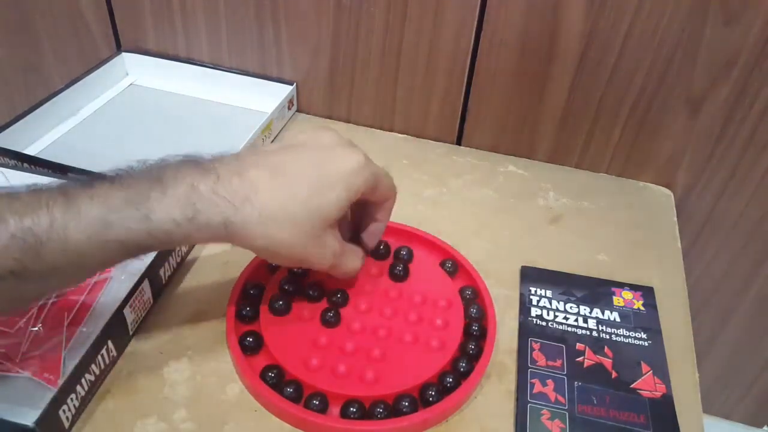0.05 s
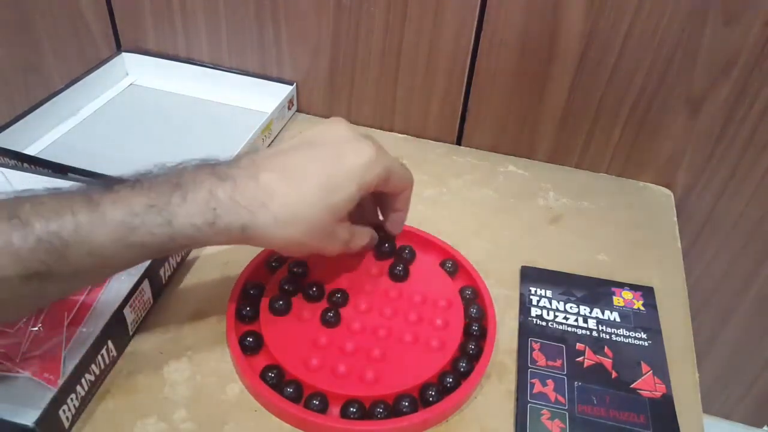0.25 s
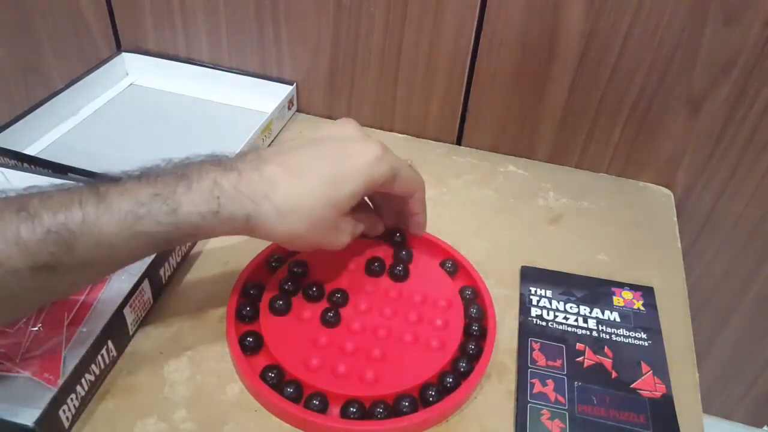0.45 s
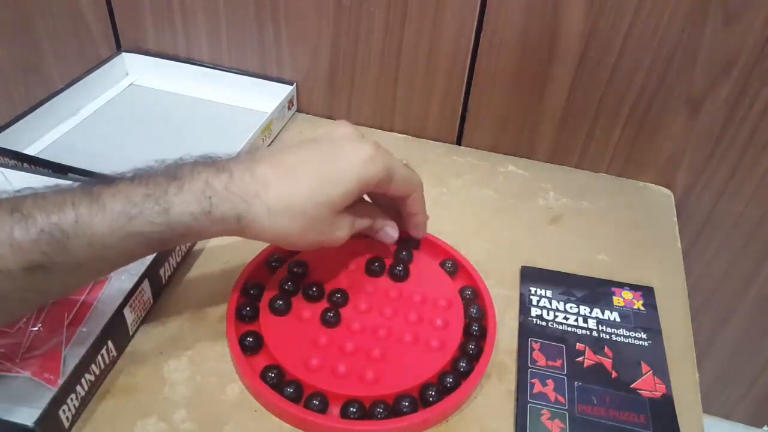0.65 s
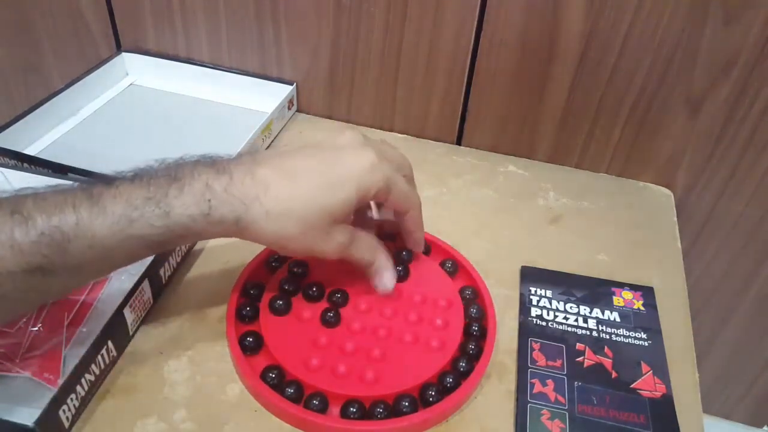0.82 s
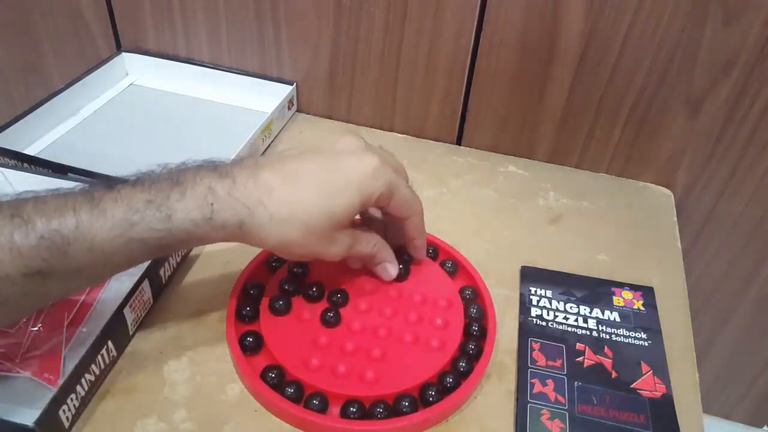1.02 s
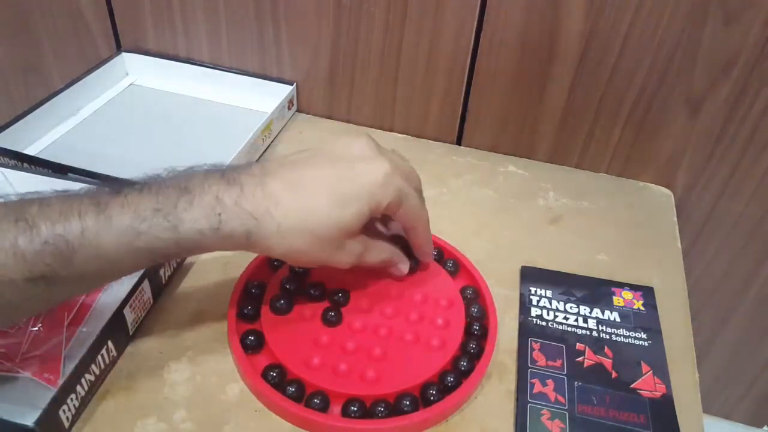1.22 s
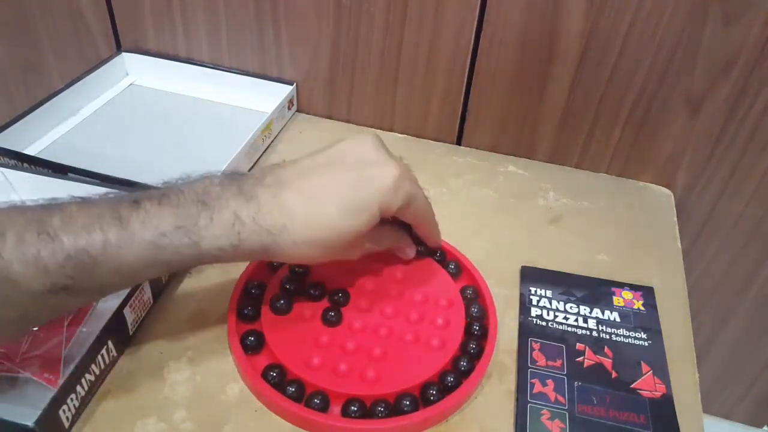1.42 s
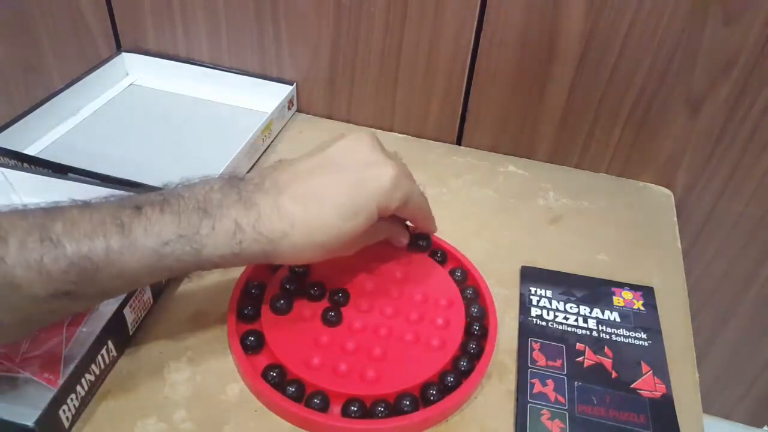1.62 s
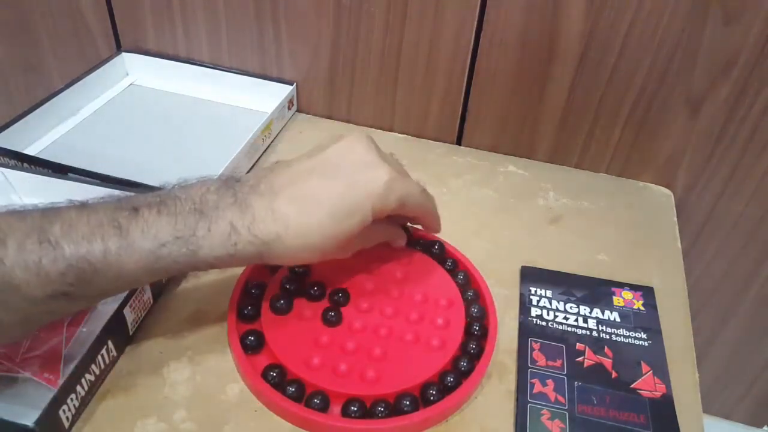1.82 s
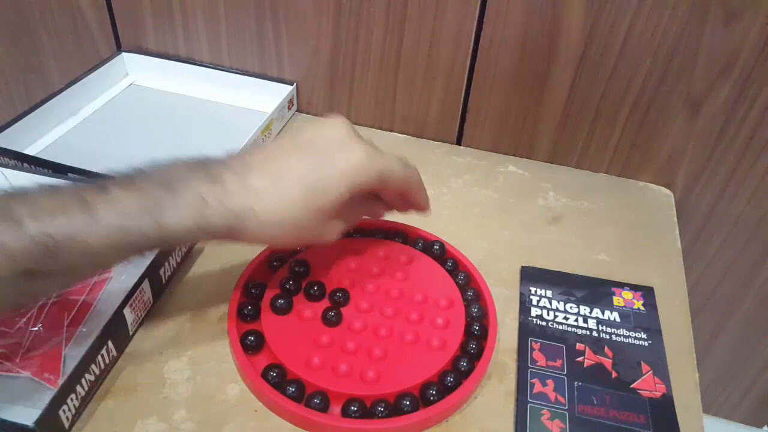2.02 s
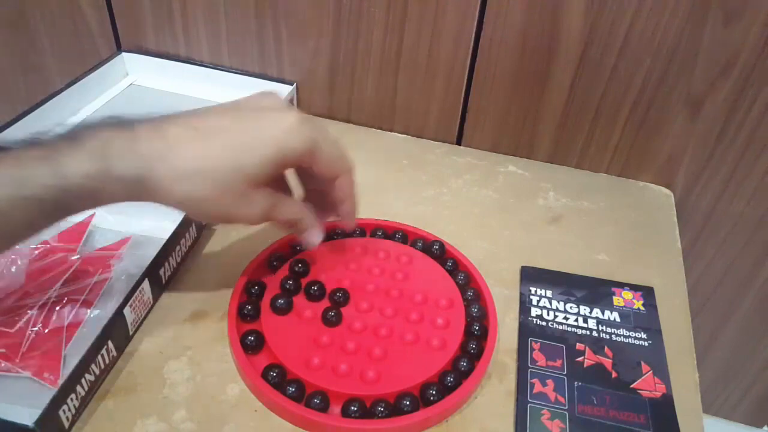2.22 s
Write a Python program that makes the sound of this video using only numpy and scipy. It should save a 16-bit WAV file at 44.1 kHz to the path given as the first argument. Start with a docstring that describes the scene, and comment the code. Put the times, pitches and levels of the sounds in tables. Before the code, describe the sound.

Marbles moved by hand clack unevenly onto a plastic board, with bright glassy ticks, tiny rolls and soft thumps from the table beneath. The sound is close, in a small room, and ends with only a faint hum and brief whine.

```python
"""Glass marbles, moved by hand, knock on a plastic solitaire board on a wooden table in a small room.
Each landing cracks at the contact, rings the board and its rim, and thumps the table.
The marbles also click against each other and roll a little, feeding tiny bumps into the board.
Under them are room air, a low hum and, at the end, a faint rising whine. Nearly mono."""
import sys
import numpy as np
from scipy import signal
from scipy.fft import rfft, irfft, next_fast_len
from scipy.io import wavfile
from scipy.ndimage import map_coordinates

SR = 44100
rng = np.random.default_rng(int(sys.argv[2]) if len(sys.argv) > 2 else 0)


def unload_wav(signal):
    """Save mono or channel-first audio to the path in sys.argv[1] as 16-bit WAV at rate SR, clipped to [-1, 1]."""
    wavfile.write(
        sys.argv[1],
        SR,
        np.round(np.clip(np.atleast_2d(signal).T, -1, 1) * 32767).astype(np.int16),
    )


N = 103635
HIT_N = SR // 2
T, HIT_T = np.arange(N) / SR, np.arange(HIT_N) / SR


def amp(db):
    """Decibels to gain."""
    return 10 ** (np.asarray(db) / 20)


def unit(x):
    """Scale to rms 1."""
    return x / np.sqrt(np.mean(x ** 2) + 1e-20)


def at_level(x, db, window_s=0.03):
    """Set the rms of a hit's opening window."""
    return amp(db) * x / np.sqrt(np.mean(x[:round(window_s * SR)] ** 2))


def along(points, hz):
    """Interpolate (f/Hz, value) points over log frequency."""
    f, values = np.transpose(points)
    return np.interp(np.log(hz + 1), np.log(f + 1), values)


def coloured(x, spectrum):
    """Filter by (f/Hz, level/dB) points."""
    m = next_fast_len(len(x) + 2048)
    gain = amp(along(spectrum, np.fft.rfftfreq(m, 1 / SR)))
    return irfft(rfft(x, m) * gain, m)[:len(x)]


def wobble(knots_per_s):
    """Smooth random curve."""
    return map_coordinates(rng.standard_normal(128), [T * knots_per_s], mode="mirror")


def add(track, start_s, sound):
    """Mix a sound into the track."""
    i = max(0, round(start_s * SR))
    track[i:i + len(sound)] += sound[:max(0, N - i)]


def burst(spectrum, t60_s):
    """Dense, heavily damped modes excited by a contact."""
    return unit(coloured(rng.standard_normal(HIT_N), spectrum) * amp(-60 * HIT_T / t60_s))


def ring(modes, scatter_db=5.5):
    """Modes that ring on; strength and sign vary from spot to spot."""
    out = np.zeros(HIT_N)
    for hz, db, t60_s in modes:
        sign = rng.choice([-1, 1])
        envelope = amp(db + scatter_db * rng.standard_normal() - 60 * HIT_T / t60_s)
        out += sign * envelope * np.sin(2 * np.pi * hz * HIT_T)
    return unit(out)


def swell(x, rise_s):
    """A body takes a moment to get moving."""
    return x * (1 - np.exp(-HIT_T / rise_s))


def tuned(spectrum, spot_hz, board_hz=800):
    """Slide the board's main resonance to that of one spot."""
    return np.array(spectrum) * [spot_hz / board_hz, 1]


# Room decay: f/Hz, t60/s
ROOM_DECAY = [(150, 0.23), (1000, 0.36), (3000, 0.27), (7000, 0.24), (15000, 0.21)]
# Wall echoes: t/s, level/dB
WALL_ECHOES = [(.0031, -6.5), (.0105, -8.5), (.0135, -12.5), (.019, -15.5)]


def in_room(x, tail_db, onset_s=0.0093, path_spread=0.06, echo_cutoff_hz=3020):
    """Direct sound, dull echoes off the near walls and the small room's tail."""
    hz, t, noise = signal.stft(rng.standard_normal(HIT_N), SR, nperseg=256)
    decay = amp(-60 * t / along(ROOM_DECAY, hz)[:, None])
    tail = signal.istft(noise * decay, SR, nperseg=256)[1]
    tail *= 1 - np.exp(-(np.arange(len(tail)) / SR / onset_s) ** 2)
    echoes = np.zeros(len(tail))
    for mean_s, db in WALL_ECHOES:
        delay_s = abs(mean_s * (1 + path_spread * rng.standard_normal()))
        echoes[round(delay_s * SR)] += amp(db)
    echoes = signal.lfilter(*signal.butter(2, echo_cutoff_hz, fs=SR), echoes)
    response = amp(tail_db) * tail / np.linalg.norm(tail) + echoes
    return x + signal.fftconvolve(x, response)[:len(x)]


# Room noise spectra, mid and side: f/Hz, level/dB
AIR_MID = [(20, 1), (40, -4), (70, -13.5), (125, 0.5), (200, -5), (400, -16), (700, -18), (1500, -21.5),
           (3000, -30.5), (6000, -36), (15000, -46.5)]
AIR_SIDE = [(20, -1), (70, 7.5), (130, -8.5), (300, -9), (600, 7), (1200, -38), (15000, -56.5)]


def air(spectrum, rms_db):
    """Steady, low room noise."""
    return amp(rms_db) * unit(coloured(rng.standard_normal(N), spectrum))


# Hum tones: f/Hz, level/dB
HUM_TONES = [(73, -53.5), (109.5, -51.5), (441, -62.5), (554.5, -76), (587, -63.5)]


def hum(waver_db=-0.5, drift_rad=0.89):
    """Low tones wavering in level and phase."""
    out = np.zeros(N)
    for hz, db in HUM_TONES:
        rms = amp(db + waver_db * wobble(10.13))
        out += rms * np.sin(2 * np.pi * hz * T + drift_rad * wobble(2.66))
    return np.sqrt(2) * out


# Glide of the unsounded fundamental: t/s, f/Hz, level/dB
WHINE_GLIDE = [(2.18, 465, -88), (2.25, 478, -59), (2.299, 514, -64.5), (2.35, 530, -52.5)]
# Partials: harmonic number, level/dB
WHINE_HARMONICS = [(3, 0), (5, -5)]


def whine(jitter=0.00405):
    """Faint, thin whine: two harmonics of a rising pitch."""
    times, hz, db = np.transpose(WHINE_GLIDE)
    pitch_hz = np.interp(T, times, hz) * (1 + jitter * wobble(50.6))
    phase = 2 * np.pi * np.cumsum(pitch_hz) / SR
    envelope = amp(np.interp(T, times, db)) * (T > times[0])
    return envelope * sum(amp(level) * np.sin(k * phase) for k, level in WHINE_HARMONICS)


# Rolls: t/s, length/s, resonance/Hz, rumble/dB, scrape/dB
MARBLE_ROLLS = [(0.0, 0.12, 830, -50, -62), (.165, 0.15, 836, -39.5, -49.5), (0.543, 0.084, 777, -32, -54),
                (1.033, 0.037, 940, -62, -58), (1.127, 0.07, 776, -42.5, -62),
                (1.19, 0.076, 870, -44.5, -50), (1.266, 0.068, 744, -40, -53),
                (1.441, 0.11, 1970, -52, -59), (1.849, 0.098, 856, -49.5, -64)]
# Rolling spectra: f/Hz, level/dB
RUMBLE_SPECTRUM = [(100, -33.5), (500, -15), (680, -5), (800, 5.5), (1000, -15.5), (1600, -26.5),
                   (2000, -18.5), (2700, -39.5), (6000, -86.5)]
SCRAPE_SPECTRUM = [(900, -8), (2100, 3), (2700, 0.5), (5000, -6.5), (8000, -15), (15000, -20.5)]


def rolls(bumps_per_s=1500, scatter_db=5):
    """A rolling marble feeds many tiny bumps into the board and scrapes lightly on it."""
    out = np.zeros(N)
    for start_s, length_s, spot_hz, rumble_db, scrape_db in MARBLE_ROLLS:
        contacts = rng.random(HIT_N) < bumps_per_s / SR
        bumps = contacts * amp(scatter_db * rng.standard_normal(HIT_N)) * rng.choice([-1, 1], HIT_N)
        rumble = amp(rumble_db) * unit(coloured(bumps, tuned(RUMBLE_SPECTRUM, spot_hz)))
        scrape = amp(scrape_db) * unit(coloured(bumps, SCRAPE_SPECTRUM))
        pressure = signal.windows.tukey(round(length_s * SR), 0.5)
        add(out, start_s, (rumble + scrape)[:len(pressure)] * pressure)
    return in_room(out, tail_db=-4)


# Marble on marble: t/s, tick/dB, ping/dB
MARBLE_CLICKS = [(0.2739, -42.5, -71), (0.284, -42, -72), (0.3325, -61, -45.5), (0.4302, -57, -58),
                 (.4665, -47, -70), (0.534, -59, -58), (.593, -44.5, -79), (0.6637, -51, -80),
                 (0.763, -52, -72), (0.8117, -58, -42), (1.2263, -39.5, -50), (1.2426, -38, -67),
                 (1.484, -65, -61), (1.512, -49, -51), (1.6562, -56, -44), (1.719, -41.5, -48),
                 (1.8274, -46.5, -51), (1.932, -40, -39), (1.9419, -56, -39), (1.9454, -43, -60),
                 (2.023, -68, -50)]
# Glass spectra: f/Hz, level/dB
TICK_SPECTRUM = [(1500, 0.5), (4000, -6.5), (7000, -3), (9500, -5), (13000, -9), (15000, -33), (16000, 4)]
PING_SPECTRUM = [(4500, -30), (6000, -7), (7200, 0), (8300, -5), (10000, -14), (13000, -32)]


def clicks():
    """Glass meets glass in a short, bright tick; a free marble adds a high ping."""
    out = np.zeros(N)
    for start_s, tick_db, ping_db in MARBLE_CLICKS:
        for spectrum, db in (TICK_SPECTRUM, tick_db), (PING_SPECTRUM, ping_db):
            click = in_room(burst(spectrum, t60_s=0.012), tail_db=-6)
            add(out, start_s, at_level(click, db))
    return out


# Wooden table thud: f/Hz, level/dB
THUD_SPECTRUM = [(30, -45), (80, -17), (150, 19), (300, 1.5), (450, 7.5), (900, -1), (2000, -43)]
# Wooden table modes: f/Hz, level/dB, t60/s
TABLE_MODES = [(127.6, -13, 0.12), (152.2, -0.5, 0.095), (167.4, -3, .15), (262.2, -13.5, 0.14),
               (432.7, -7, 0.13)]


def table_thump(db, ring_db=7):
    """The table under the board thuds and rings low."""
    thud = in_room(burst(THUD_SPECTRUM, t60_s=0.057), tail_db=-3.5)
    thump = thud + amp(ring_db) * ring(TABLE_MODES)
    return at_level(swell(thump, rise_s=0.0057), db)


# Board and rim clack spectra: f/Hz, level/dB
LOW_SPECTRUM = [(200, -28), (500, -12), (800, -3.5), (1100, -3.5), (1500, -49), (3000, -86)]
HIGH_SPECTRUM = [(600, -19), (1100, -6), (1420, -5.5), (1580, -1), (1750, -32), (2500, -47), (5000, -65)]
RIM_SPECTRUM = [(1200, -55), (1750, -1.5), (2050, 7.5), (2300, -10), (2700, -15), (5000, -44.5)]
# Board and rim modes: f/Hz, level/dB, t60/s
LOW_MODES = [(560, -10, .08), (713, -5, .14), (783, -1, .16), (823, 0, .15), (870, -4, .1), (1043, -2, .18),
             (1154, -5, .17)]
HIGH_MODES = [(1338, -14, 0.51), (1395, 3, 0.2), (1488, 16.5, 0.043), (1549, -15, 0.21)]
RIM_MODES = [(1833, -0.57, 0.3), (2010, -1.8, 0.23), (2120, -2, 0.15)]


def board_clack(spot_hz, low_db, high_db, rim_db, lift_db=10.5, width_oct=0.13):
    """Board and rim clack and ring; the struck spot favours low modes near its resonance."""
    def band(spectrum, modes, db, ring_db):
        clack = in_room(burst(spectrum, t60_s=0.017), tail_db=-4) + amp(ring_db) * ring(modes)
        return at_level(swell(clack, rise_s=0.00058), db)

    favoured = [(hz, db + lift_db * np.exp(-(np.log2(hz / spot_hz) / width_oct) ** 2), t60_s)
                for hz, db, t60_s in LOW_MODES]
    low = band(tuned(LOW_SPECTRUM, spot_hz), favoured, low_db, ring_db=5.5)
    high = band(HIGH_SPECTRUM, HIGH_MODES, high_db, ring_db=5)
    rim = band(RIM_SPECTRUM, RIM_MODES, rim_db, ring_db=-2)
    return low + high + rim


# Contact crack: f/Hz, level/dB
CRACK_SPECTRUM = [(800, -6.5), (2000, -8), (3000, 10.5), (4000, -0.5), (5300, 0.5), (8000, -15),
                  (12000, -15), (15000, -25), (16000, -28)]
# Marble on board: t/s, resonance/Hz, thump/dB, board low/dB, board high/dB, rim/dB, crack/dB
MARBLE_KNOCKS = [(0.0, 816, -49, -36.5, -49, -49, -60), (.079, 836, -46, -39.5, -51, -53.5, -56),
                 (.099, 910, -49, -42.5, -56, -58, -64), (.17, 865, -51, -42, -57, -57, -58.5),
                 (.202, 860, -59, -34, -61, -55, -63), (0.2751, 816, -39, -27.5, -44, -40, -41.5),
                 (.321, 720, -64, -26.5, -43, -34.5, -38), (0.3339, 790, -28, -29, -23, -31, -33),
                 (.4665, 830, -58, -27, -41, -50, -45.5), (.4705, 830, -50, -23.5, -34, -37, -47),
                 (0.5327, 794, -36, -21.5, -26.5, -32, -36.5), (.546, 773, -43.5, -31, -36, -46, -42),
                 (.558, 960, -48, -27.5, -41, -40, -50), (.593, 730, -42, -33.5, -42, -42.5, -49.5),
                 (.605, 1070, -53, -36, -32, -52, -51.5), (.6135, 765, -47, -39, -45, -37, -46.5),
                 (0.7621, 770, -48, -48.5, -49, -50, -51.5), (0.8011, 810, -60, -31.5, -34, -44, -39.5),
                 (0.8111, 750, -29.5, -26, -20, -28, -32.5), (.822, 1100, -43.5, -26, -23, -28, -34),
                 (.837, 830, -39.5, -29, -30.5, -37.5, -39), (1.113, 815, -46, -38.5, -48, -54, -49),
                 (1.121, 890, -57, -36, -42.5, -50, -52), (1.206, 830, -65, -35.5, -48, -67, -53),
                 (1.225, 850, -45.5, -39, -42.5, -66, -68), (1.242, 933, -44, -35, -35, -64, -48.5),
                 (1.38, 740, -46, -56, -51.5, -59, -60), (1.484, 950, -45, -45, -51.5, -61, -58),
                 (1.527, 774, -42, -38, -41, -49, -55), (1.5424, 1131, -35, -23, -19.5, -25.5, -33),
                 (1.555, 1070, -72, -47, -26, -35.5, -56), (1.6572, 727, -32.5, -21.5, -25.5, -26, -27.5),
                 (1.7197, 770, -41, -37.5, -39, -42.5, -43), (1.8268, 745, -40, -39.5, -30.5, -41, -47.5),
                 (1.925, 870, -38.5, -43, -34.5, -44, -45), (1.944, 850, -45, -37, -46, -52, -72),
                 (2.023, 790, -41, -29, -32, -43, -43), (2.026, 1056, -41.5, -25, -28.5, -36, -43)]


def knocks():
    """A marble lands: the board clacks, the table thumps, the contact cracks."""
    out = np.zeros(N)
    for start_s, spot_hz, thump_db, low_db, high_db, rim_db, crack_db in MARBLE_KNOCKS:
        clack = board_clack(spot_hz, low_db, high_db, rim_db)
        thump = table_thump(thump_db)
        crack = in_room(burst(CRACK_SPECTRUM, t60_s=0.02), tail_db=-5)
        add(out, start_s, clack + thump + at_level(crack, crack_db))
    return out


def scene():
    """Both channels are alike but for a little low room noise."""
    mid = knocks() + clicks() + rolls() + hum() + air(AIR_MID, rms_db=-50) + whine()
    side = air(AIR_SIDE, rms_db=-60)
    return np.array([mid + side, mid - side])


def record(dry, knee_db=-4.5, low_hz=32, top_hz=15900):
    """Round off the highest peaks, then limit the band."""
    rounded = dry / (1 + (dry / amp(knee_db)) ** 6) ** (1 / 6)
    m = next_fast_len(N + 8192)
    hz = np.fft.rfftfreq(m, 1 / SR)
    low_cut = hz ** 4 / (hz ** 4 + low_hz ** 4)
    return irfft(rfft(rounded, m) * low_cut * (hz < top_hz), m)[:, :N]


dry = scene()
out = record(dry)
unload_wav(out)
```